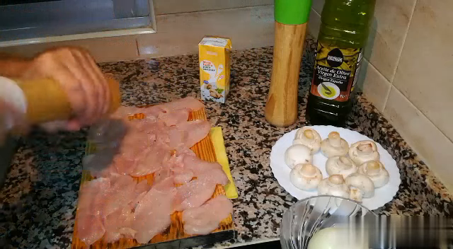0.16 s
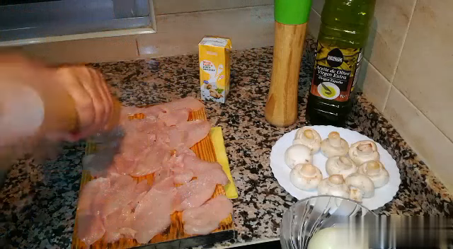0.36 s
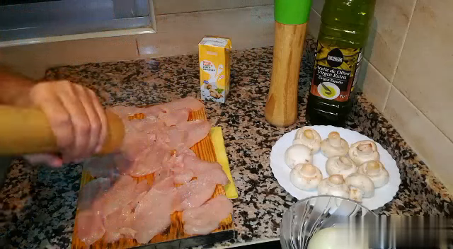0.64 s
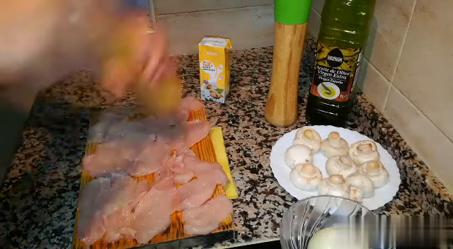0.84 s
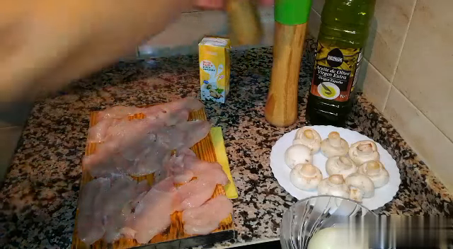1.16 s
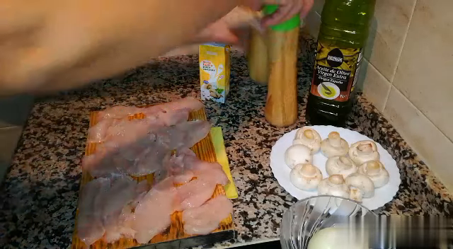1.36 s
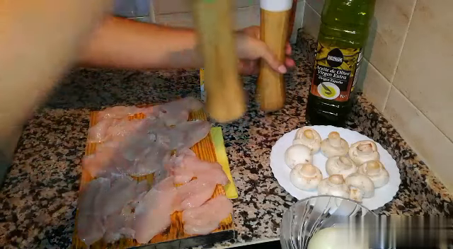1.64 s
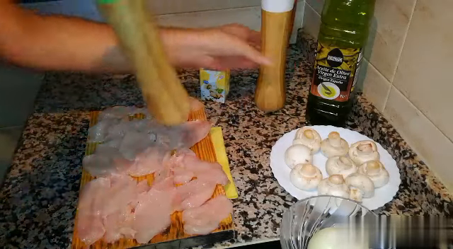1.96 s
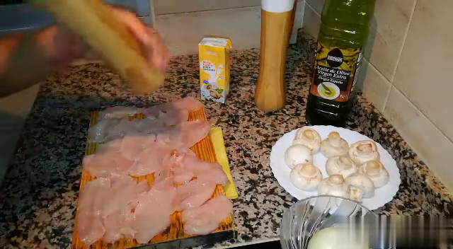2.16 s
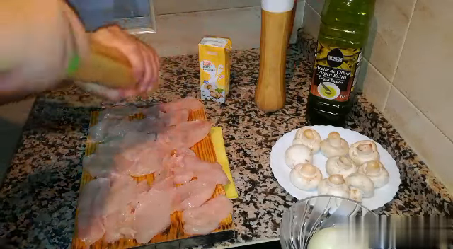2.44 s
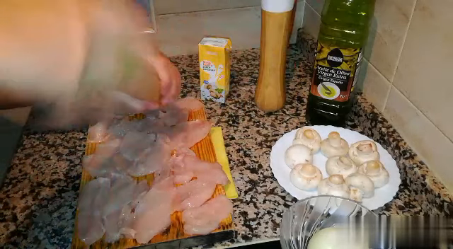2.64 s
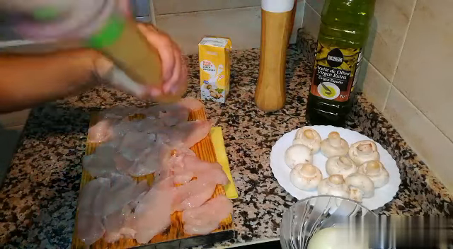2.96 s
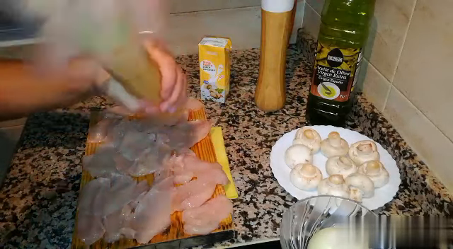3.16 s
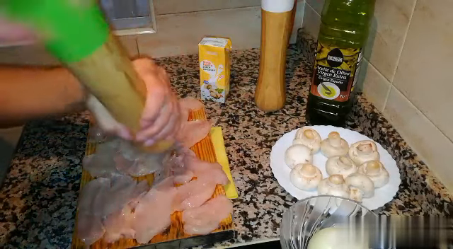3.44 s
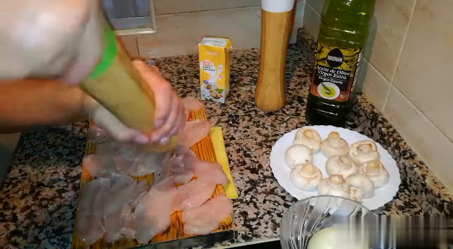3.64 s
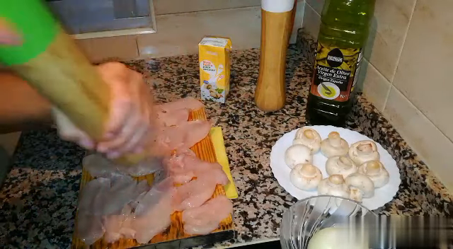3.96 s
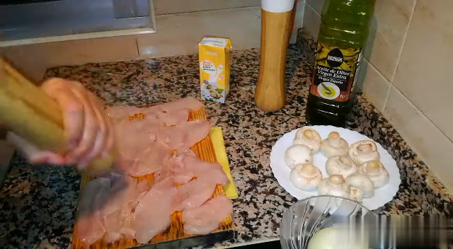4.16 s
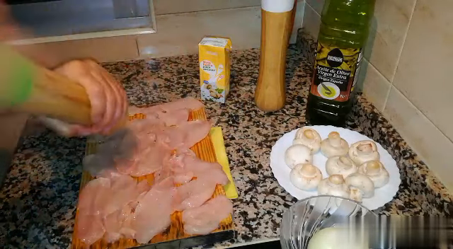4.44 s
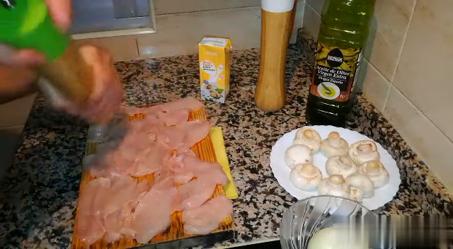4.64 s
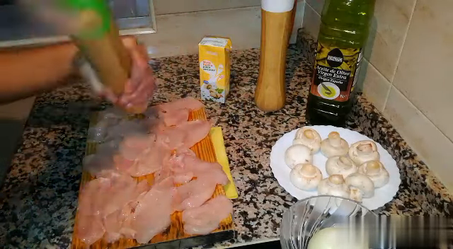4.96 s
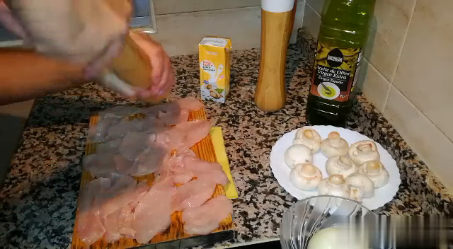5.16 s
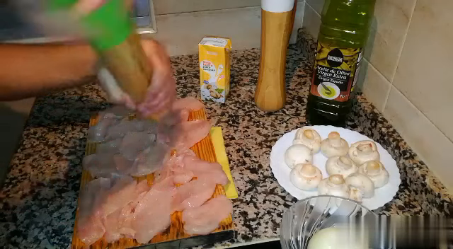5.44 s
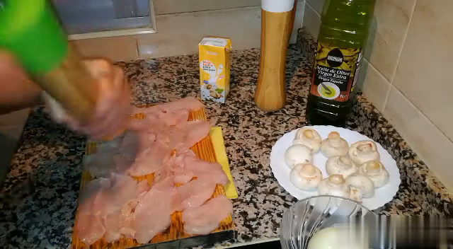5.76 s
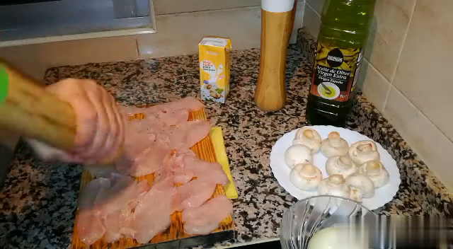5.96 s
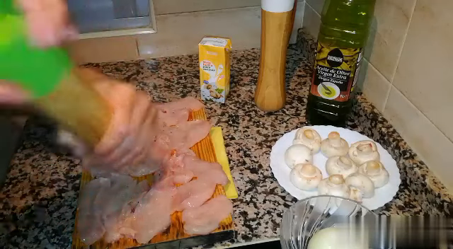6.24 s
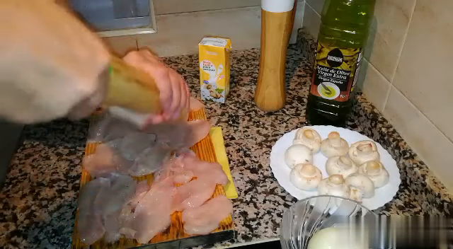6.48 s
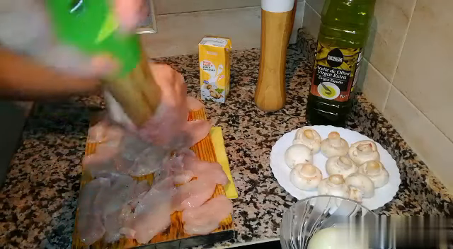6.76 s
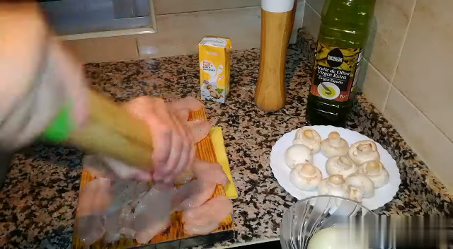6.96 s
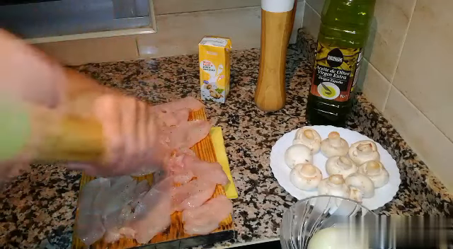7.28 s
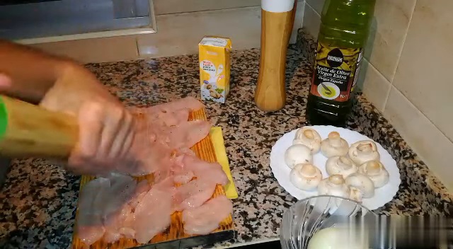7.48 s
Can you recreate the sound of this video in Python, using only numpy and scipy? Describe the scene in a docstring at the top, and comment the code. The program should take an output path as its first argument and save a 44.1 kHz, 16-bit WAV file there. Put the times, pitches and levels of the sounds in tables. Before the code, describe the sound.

Wooden mills grind salt, then pepper, in short crackling crunches, with a clack on a stone counter between and a faint hum.

```python
"""Two tall wooden mills are twisted over a board in a tiled kitchen corner: first salt, then pepper.
Each twist crushes a stream of tiny grains, with single loud cracks, that shake the wooden body and hiss
at the steel burr. The salt mill's spindle slips and rings; that mill is then set down and rocks on the
stone counter. Handling adds soft booms and thin tones. An appliance hums faintly throughout."""
import sys
import numpy as np
from scipy import signal
from scipy.fft import rfft, irfft, next_fast_len
from scipy.io import wavfile
from scipy.ndimage import uniform_filter1d, map_coordinates

SR = 44100
rng = np.random.default_rng(int(sys.argv[2]) if len(sys.argv) > 2 else 0)


def transcribe(signal):
    """Save signal, clipped to [-1, 1], as a 16-bit WAV file at the path in sys.argv[1]."""
    frames = np.atleast_2d(signal).T
    limited = np.clip(frames, -1, 1)
    pcm = np.round(limited * 32767).astype(np.int16)
    wavfile.write(sys.argv[1], SR, pcm)


N = 335683


def amp(db):
    return 10 ** (np.asarray(db) / 20)


def unit_rms(x):
    return x / np.sqrt(np.mean(x ** 2) + 1e-20)


def unit_energy(x):
    return x / np.sqrt(np.sum(x ** 2, axis=-1, keepdims=True) + 1e-20)


def curve_at(points, hz):
    """Interpolate (Hz, value) points on a log frequency axis."""
    point_hz, values = np.transpose(points)
    return np.interp(np.log(hz + 1), np.log(point_hz + 1), values)


def seconds(length_s):
    return np.arange(int(length_s * SR)) / SR


def add(track, start_s, sound):
    start = round(start_s * SR)
    part = sound[..., :N - start]
    track[..., start:start + part.shape[-1]] += part


def filtered(x, gain_at):
    """Zero-phase filter with gain gain_at(hz)."""
    size = next_fast_len(x.shape[-1] + SR // 10)
    return irfft(rfft(x, size) * gain_at(np.fft.rfftfreq(size, 1 / SR)), size)[..., :x.shape[-1]]


def coloured(x, spectrum, size=2048):
    """Minimum-phase filter of unit energy, shaped by (Hz, dB) points."""
    cepstrum = irfft(np.log(amp(curve_at(spectrum, np.fft.rfftfreq(size, 1 / SR)))))
    cepstrum[1:size // 2] *= 2
    cepstrum[size // 2 + 1:] = 0
    impulse = unit_energy(irfft(np.exp(rfft(cepstrum))))
    return signal.oaconvolve(x, impulse)[:len(x)]


def ring(modes, scatter_db, wave=np.cos, detune=0):
    """Damped modes at random strengths, with an optional common pitch shift; unit energy."""
    t = seconds(0.5)
    shift = 1 + detune * rng.normal()
    partials = [amp(db + scatter_db * rng.normal() - 60 * t / t60_s) * wave(2 * np.pi * shift * hz * t)
                for hz, db, t60_s in modes]
    return unit_energy(sum(partials))


# Each row: frequency in Hz, rms level in dB.
HUM_LINES = [(75.5, -87), (100, -74.5), (120, -74.5), (181, -86.5)]
# Each row: frequency in Hz, relative density in dB.
AIR_SPECTRUM = [(12, -44), (20, -11.5), (60, -18), (78, -14), (106, -13.5), (148, -18), (185, -8.5),
                (266, -22.5), (320, -17), (560, -22.5), (760, -17.5), (985, -20), (3400, -28.5),
                (4200, -29.5), (6720, -37.5), (11000, -52), (15500, -54.5)]


def hum_and_air():
    """An appliance's hum lines waver together in level over the still air of the room."""
    t = np.arange(N) / SR
    waver = map_coordinates(rng.standard_normal(int(3 * t[-1]) + 4), [3 * t])  # 3 new values a second
    hum = sum(np.sqrt(2) * amp(db + 1.6 * waver) * np.sin(2 * np.pi * (hz * t + rng.random()))
              for hz, db in HUM_LINES)
    noise = rng.standard_normal((2, N))
    mid, side = unit_rms(filtered(noise, lambda hz: amp(curve_at(AIR_SPECTRUM, hz))))
    side = filtered(side, lambda hz: amp(curve_at([(120, -11.0), (400, 1.5), (1500, 0.5)], hz)))
    return hum + amp(-72.0) * np.array([mid + side, mid - side])


# Each row: frequency in Hz, T60 in seconds.
TAIL_DECAY = [(100, 0.47), (260, 0.031), (700, 0.27), (1840, 0.26), (4850, 0.27), (12800, 0.22)]
# Each row: frequency in Hz, gain in dB.
TAIL_COLOUR = [(300, 0), (3000, -0.35), (6000, 0), (12000, -1)]


def room_tail():
    """Diffuse stereo decay; long waves reach both sides more alike."""
    def width_rad(hz):
        coherence = curve_at([(150, 0.31), (350, 0.0), (700, 0.0), (2000, 0.2)], hz)
        return np.arccos(coherence) / 2

    band_hz, t, bands = signal.stft(rng.standard_normal((2, SR // 2)), SR, nperseg=256)
    decay = amp(-60 * t / curve_at(TAIL_DECAY, band_hz)[:, None])
    _, noise = signal.istft(bands * decay, SR, nperseg=256)
    mid, side = noise[:, :SR // 2] * (1 - np.exp(-seconds(0.5) / 0.0024))
    mid = filtered(mid, lambda hz: np.cos(width_rad(hz)))
    side = filtered(side, lambda hz: np.sin(width_rad(hz)))
    tail = unit_energy(np.array([mid + side, mid - side]))
    return filtered(tail, lambda hz: amp(curve_at(TAIL_COLOUR, hz)))


# Standing waves between the walls. Each row: frequency in Hz, relative level in dB, T60 in seconds.
ROOM_MODES = [(196, -1.5, 0.27), (217, -9, 0.24), (317, -4.5, 0.66), (397, 3.5, 0.18), (524, -2.5, 0.65)]
# Each row: frequency in Hz, left minus right in dB.
STEREO_BALANCE = [(200, 0.5), (600, 0.6), (1200, 0.5), (3000, 3), (5500, 2), (8000, 0), (12000, -4)]


def kitchen(x, walls_db, tail_db, modes_db=-23, max_lag_s=0.00008):
    """Direct sound, quick echoes off counter and tiles, room modes and tail, in stereo."""
    response = amp(tail_db) * room_tail() + amp(modes_db) * ring(ROOM_MODES, scatter_db=2.5)
    for left_s in rng.uniform(0.0006, 0.009, size=14):
        echo = amp(walls_db) * np.exp(-left_s / 0.0048) * rng.choice([-1, 1])
        right_s = left_s + rng.uniform(-0.0007, 0.0007)
        response[0, round(left_s * SR)] += echo
        response[1, abs(round(right_s * SR))] += echo
    # direct path: the left lags, depending on where the mill is held
    response[0, round(max_lag_s * SR * rng.random())] += 1
    response[1, 0] += 1
    heard = signal.fftconvolve(x[None], unit_energy(response), axes=1)
    return filtered(heard, lambda hz: amp(np.outer([0.5, -0.5], curve_at(STEREO_BALANCE, hz))))


def fractures(samples, rate_per_s, spread_db):
    """Breaking grains: sparse impulses of unequal size, unit rms."""
    sizes = amp(spread_db * np.clip(rng.standard_normal(samples), -2, 2)) * rng.choice([-1, 1], samples)
    return unit_rms(sizes * (rng.random(samples) < rate_per_s / SR))


SCRAPE_S, SCRAPE_DB, SCRAPE_DB_PER_S = 0.025, -0.5, 1299
BITE_S, BITE_SLACK_DB = 0.0038, 14.5
SAG_DB_PER_S, RELEASE_DB_PER_S = 10, 418.5
FIRM_PUSH_DB = -24
FIZZ_POWER = 1.5  # sharper fractures reach further into the top octave


def crush(length_s, rise_s, db, hiss_db, knock_db, firm_grains_per_s, spread_db):
    """One push: the burr scrapes in, bites, sags as grains give way and releases as the wrist stops."""
    t = seconds(SCRAPE_S + length_s + 0.1) - SCRAPE_S
    slack_db = BITE_SLACK_DB * np.clip(1 - t / max(rise_s, 1 / SR), 0, 1) ** 2
    scrape_cut_db = SCRAPE_DB_PER_S * np.maximum(BITE_S - t, 0) + SCRAPE_DB * (t < 0)
    fade_db = SAG_DB_PER_S * (t - rise_s) + RELEASE_DB_PER_S * np.maximum(t - length_s, 0)
    force = amp(db - slack_db - scrape_cut_db - fade_db)
    # a weaker push shaves more, smaller grains; each sheds a puff of dust
    grains_per_s = firm_grains_per_s * amp(0.5 * (FIRM_PUSH_DB - db))
    grains = fractures(len(t), grains_per_s, spread_db)
    puffs = np.sqrt(np.abs(uniform_filter1d(grains ** 2, size=60)))
    dust = unit_rms(rng.standard_normal(len(t)) * puffs)
    # a slack burr slides and hisses; only a firm bite shakes the base
    sharpness = amp(hiss_db + 0.43 * slack_db)
    thuds = fractures(len(t), 2 * grains_per_s, spread_db) * amp(knock_db - 0.38 * slack_db)
    return force * np.array([grains, dust * sharpness, dust * sharpness ** FIZZ_POWER, thuds])


def burst(t60_s, snap):
    """A sharp impulse and a few ms of splintering, unit energy."""
    t = seconds(0.04)
    splinters = unit_energy(rng.standard_normal(len(t)) * amp(-60 * t / t60_s))
    splinters[0] += snap
    return unit_energy(splinters)


def ping(hz, t60_s, rise_s):
    """A bursting grain kicks the burr for a few cycles, unit energy."""
    t = seconds(0.04)
    swing = np.sin(2 * np.pi * hz * t) * amp(-60 * t / t60_s) * (1 - np.exp(-t / rise_s))
    return unit_energy(np.diff(swing, prepend=0))  # a small body radiates its change of motion: no bass


# Burr hiss and its finer fizz. Each row: frequency in Hz, relative gain in dB.
BURR_SPECTRUM = [(800, -40), (2500, 7.5), (4200, -2.5), (5700, 5), (7000, -2), (8300, -12), (11000, -19),
                 (15000, -34.5), (16000, -39)]
FIZZ_SPECTRUM = [(2000, -22), (5000, 3.5), (7500, 6), (9500, -0.5), (12000, -5.5), (14500, -9.5),
                 (15500, -8.5), (16000, -21.5)]
# Each row: frequency in Hz, relative level in dB, T60 in seconds.
BURR_MODES = [(1970, 4, 0.073), (2710, -2.5, .03), (4020, -3, 0.027), (4700, -2.5, 0.005), (5710, -3, .02),
              (6910, -5, .02)]
NEW_GRIP_S, GRIP_DETUNE = 0.25, 0.018  # push spacing that starts a new twist; its relative pitch scatter


def mill(pushes, cracks, wood_spectrum, base_spectrum, body_modes, *, wood_ring_db, steel_ring_db,
         crunch_db, hiss_db, fizz_db, knock_db, firm_grains_per_s, spread_db,
         crack_db, ping_db, crack_hiss_db, crack_fizz_db, crack_knock_db, crack_t60_s):
    """Fractures shake body and base and hiss at the burr; the mill moves, so each twist echoes anew."""
    forces, pings, out = np.zeros((4, N)), np.zeros(N), np.zeros((2, N))
    gains = amp([[crunch_db], [hiss_db], [fizz_db], [knock_db]])
    for start_s, *push in pushes:
        add(forces, start_s - SCRAPE_S, gains * crush(*push, firm_grains_per_s, spread_db))
    body, burr, fizz, knock = forces
    push_s, *_, push_knock_db = np.transpose(pushes)
    for start_s, db, hz, pitched_db, bright_db in cracks:
        # a crack knocks the base as firmly as the push it falls in
        low_db = push_knock_db[np.searchsorted(push_s, start_s + 2 * BITE_S) - 1]
        top_db = FIZZ_POWER * bright_db
        add(body, start_s, amp(db + crack_db) * burst(crack_t60_s, snap=0.94))
        add(pings, start_s, amp(db + pitched_db + ping_db) * ping(hz, t60_s=0.0085, rise_s=0.00062))
        add(burr, start_s, amp(db + bright_db + crack_hiss_db) * burst(t60_s=0.0036, snap=0.14))
        add(fizz, start_s, amp(db + top_db + crack_fizz_db) * burst(t60_s=0.021, snap=0.11))
        add(knock, start_s, amp(db + low_db + crack_knock_db) * burst(t60_s=0.0044, snap=0.089))
    body = coloured(body, wood_spectrum)
    hiss = coloured(burr, BURR_SPECTRUM) + coloured(fizz, FIZZ_SPECTRUM)
    direct = body + pings + hiss + coloured(knock, base_spectrum)
    twist_s = list(push_s[np.diff(push_s, prepend=-1) > NEW_GRIP_S] - 0.04)
    for start_s, end_s in zip(twist_s, twist_s[1:] + [push_s[-1] + 0.5]):
        twist = slice(round(start_s * SR), round(end_s * SR))
        wood = signal.oaconvolve(body[twist], ring(body_modes, scatter_db=4.5, detune=GRIP_DETUNE))
        steel = signal.oaconvolve(burr[twist], ring(BURR_MODES, scatter_db=1.0))
        ringing = amp(wood_ring_db) * wood + amp(steel_ring_db) * steel
        sound = direct[twist] + ringing[:len(direct[twist])]
        add(out, start_s, kitchen(sound, walls_db=-2.0, tail_db=0.98))
    return out


# Wrist pushes, each turning the burr until it catches.
# Each row: start, length and rise in seconds, level in dB, relative hiss and knock in dB.
SALT_PUSHES = [(0.104, 0.094, 0.062, -34.5, -7, -16.5), (0.314, 0.018, 0.012, -49.5, -8, -9.5),
               (0.543, 0.071, 0.037, -42.5, -3.5, -10), (0.61, 0.025, 0.0114, -41, -9, -8)]
# Bursting grains and jolts of the burr.
# Each row: start in seconds, level in dB, ping pitch in Hz, relative ping and hiss in dB.
SALT_CRACKS = [(0.315, -46, 1400, -10, 0.5), (0.346, -37, 1850, -4.5, -22), (0.527, -47, 1410, -7, -32),
               (0.561, -33.5, 950, 3, -14), (0.6155, -22, 1600, 2, -15)]
# Wooden body and hollow base. Each row: frequency in Hz, relative gain in dB.
SALT_WOOD = [(100, -52), (300, -25), (550, -12), (750, -19.5), (1100, -9), (1400, -6.5), (1750, -5.5),
             (2250, 3.5), (2700, -1), (3100, 0), (4000, -8), (7000, -36), (12000, -40)]
SALT_BASE = [(30, -58.5), (250, -12), (420, -9), (560, -7.5), (720, -0.5), (950, 7.5), (1380, 6.5),
             (2000, -5), (3500, -12), (9000, -56)]
# Body resonances. Each row: frequency in Hz, relative level in dB, T60 in seconds.
SALT_MODES = [(1368, -4, .05), (2240, 1, 0.026), (2690, -6.5, .05), (3070, -4, .06), (4030, 5, .08)]


def salt_mill():
    """Fine crystals crush densely and thinly."""
    return mill(SALT_PUSHES, SALT_CRACKS, SALT_WOOD, SALT_BASE, SALT_MODES,
                wood_ring_db=-19.5, steel_ring_db=-16, firm_grains_per_s=1200, spread_db=1.0,
                crunch_db=1.2, hiss_db=3, fizz_db=-5.0, knock_db=3,
                crack_db=13, ping_db=19.5, crack_t60_s=0.0029,
                crack_hiss_db=22.5, crack_fizz_db=-0.5, crack_knock_db=23.0)


# Each row: start in seconds, level in dB.
SPINDLE_SLIPS = [(0.559, -14.5), (0.618, -6.5)]
# Each row: frequency in Hz, relative level in dB, T60 in seconds.
SPINDLE_MODES = [(892, 5.5, 0.21), (1133, -13, 0.091), (1544, 1, 0.13), (1772, 6, 0.26), (2180, -9.5, 0.11)]


def spindle(blur_hz=32):
    """The salt mill's spindle slips free and rings; the rubbing burr makes each mode's phase wander."""
    out, t = np.zeros((2, N)), seconds(0.45)
    for start_s, db in SPINDLE_SLIPS:
        steps_rad = rng.standard_normal((len(SPINDLE_MODES), len(t))) * np.sqrt(2 * np.pi * blur_hz / SR)
        squeak = sum(amp(mode_db - 60 * t / t60_s) * np.sin(2 * np.pi * hz * t + drift)
                     for (hz, mode_db, t60_s), drift in zip(SPINDLE_MODES, np.cumsum(steps_rad, axis=1)))
        add(out, start_s, amp(db) * kitchen(unit_energy(squeak), walls_db=-10.5, tail_db=5.0))
    return out


# Each row: start and length in seconds, pitch in Hz, peak level in dB.
HANDLING_TONES = [(1.27, 0.1, 124, -56.5), (1.78, 0.19, 2627, -69), (3.14, 0.243, 2616, -75),
                  (3.5, 0.091, 294, -47), (5.48, 0.13, 183.6, -47.5), (5.96, 0.15, 117, -48.5),
                  (6.34, 0.092, 189, -37), (6.41, 0.065, 107.7, -48), (7.04, 0.16, 204, -51.5),
                  (7.2, 0.15, 2640, -69.5)]


def handling():
    """Soft booms and faint thin tones swell and fade, slightly unsteady, as the mills are handled."""
    out = np.zeros(N)
    for start_s, length_s, hz, db in HANDLING_TONES:
        t = seconds(length_s)
        waver = 0.024 * unit_rms(uniform_filter1d(rng.standard_normal(len(t)), size=200))
        tone = np.sin(2 * np.pi * np.cumsum(hz * (1 + waver)) / SR)
        add(out, start_s, amp(db) * np.sin(np.pi * t / length_s) * tone)
    return out


# Each row: start in seconds, level in dB, upper cutoff in Hz.
FOOT_CONTACTS = [(1.6099, -14.5, 13800), (1.65, -20, 294), (1.728, -28.5, 400)]
# Each row: frequency in Hz, relative gain in dB.
FOOT_SPECTRUM = [(30, -41), (70, -21), (125, -7.5), (180, -8), (260, -4.5), (400, -12.5), (520, -11),
                 (760, -1), (1150, 1.5), (1500, -7.5), (1800, -12.5), (2200, -21), (2800, -21.5),
                 (3350, -18.5), (4100, -31), (6000, -28.5), (9000, -56), (15000, -73.5)]
# Each row: frequency in Hz, relative level in dB, T60 in seconds.
COUNTER_MODES = [(124, 5, 0.25), (196, -1.5, 0.21), (225.3, -4, 0.39), (402, -7, 0.5), (450, -8, 0.3),
                 (683.5, -4.5, 0.2), (830, 4, 0.11), (882, -4, 0.2), (1130, 2.5, 0.17), (1292, -11, 0.23),
                 (1580, -13.5, 0.19)]


def set_down():
    """The salt mill's foot clacks on stone, then rocks with two thuds; each contact rings the counter."""
    out = np.zeros((2, N))
    for start_s, db, cutoff_hz in FOOT_CONTACTS:
        impact = np.pad(burst(t60_s=0.0075, snap=2.0), (0, SR // 2))
        contact = signal.butter(2, [65, cutoff_hz], "bandpass", fs=SR, output="sos")
        clack = signal.sosfilt(contact, coloured(impact, FOOT_SPECTRUM))
        boom = signal.sosfilt(contact, ring(COUNTER_MODES, scatter_db=2.5, wave=np.sin))
        add(out, start_s, amp(db + 23.0) * kitchen(clack, walls_db=0.0, tail_db=5))
        add(out, start_s, amp(db + 16.0) * boom)
    return out


# Each row: start, length and rise in seconds, level in dB, relative hiss and knock in dB.
PEPPER_PUSHES = [ (2.28, 0.12, 0.043, -78, 7.5, -12), (2.364, 0.0497, 0.031, -35.5, -12.5, 0.5),
                 (2.416, 0.1, 0.0032, -25, -16.5, -9.5), (2.893, 0.14, 0.043, -52.5, -2.5, -1),
                 (3.005, 0.071, .005, -50.5, -1.5, 2.5), (3.425, 0.063, 0.0437, -28.5, -16.5, -4.5),
                 (3.548, 0.052, 0.06, -31, -14, -1.5), (3.655, 0.023, 0.0073, -41, -6.5, -4),
                 (4.009, 0.014, 0.012, -36.5, -19.5, -5), (4.143, 0.16, .005, -45, 2.5, -15.5),
                 (4.654, 0.1, 0.049, -37.5, -7, -11.5), (4.755, 0.022, .01, -34.5, -20.5, -2.5),
                 (5.056, 0.11, 0.023, -24, -11.5, -10), (5.457, 0.045, 0.034, -26, -10, -10.5),
                 (5.525, 0.0426, 0.017, -22, -16, -10), (5.892, 0.029, 0.014, -22.5, -8.5, -9),
                 (5.975, 0.029, 0.012, -27, -16, -5), (6.303, 0.0046, 0.0042, -34, -13, -4),
                 (6.334, 0.098, 0.0082, -21, -17.5, -11.5), (6.77, 0.027, 0.01, -57.5, -1.5, -4),
                 (6.824, 0.0098, .003, -45.5, 0, -9.5), (6.931, .012, 0.0024, -45, 4.5, -23),
                 (7.0, 0.085, 0.021, -44, 1.5, -44), (7.062, 0.055, 0.04, -41, -8.5, -4.5),
                 (7.528, 0.25, 0.012, -21.5, -13.5, -10)]
# Each row: start in seconds, level in dB, ping pitch in Hz, relative ping and hiss in dB.
PEPPER_CRACKS = [(2.366, -34.5, 1330, 6.5, -31), (2.4157, -14, 2860, -1, -25),
                 (2.458, -11.5, 2703, 1.5, -15.5), (2.496, -13, 2300, -3.5, -19),
                 (2.872, -49, 1520, 4, -36), (3.008, -25.5, 1410, -5, -30), (3.424, -39, 1402, -1, -26),
                 (3.445, -19, 1230, 2.5, -34), (3.455, -12, 1290, -1, -29.5),
                 (3.478, -11.5, 1370, -2.5, -25.5), (3.539, -31, 2940, -1, 1.5),
                 (3.557, -18.5, 1860, -3.5, -5), (3.596, -16, 1220, -1.5, -19.5),
                 (3.601, -13.5, 1560, -5.5, -19.5), (3.609, -15.5, 2880, 1.5, -29),
                 (3.662, -22.5, 1187, -0.5, -14), (4.017, -18, 1750, -4.5, -38),
                 (4.0202, -20.5, 1700, -4, -37.5), (4.026, -26.5, 2100, -6.5, -29.5),
                 (4.143, -15.5, 1910, -1.5, -2.5), (4.191, -18.5, 2670, -0.5, -2.5),
                 (4.29, -27, 1945, -7, -10.5), (4.319, -30.5, 1047, 2.5, -31), (4.655, -40, 1900, 9, -13),
                 (4.6839, -27.5, 1360, 7, -25.5), (4.761, -26.5, 1900, -5, -24),
                 (4.768, -20.5, 1650, -4, -19.5), (5.055, -27.5, 2300, -2.5, -16),
                 (5.064, -21, 1700, -2.5, -22), (5.087, -16.5, 2200, -3, -21.5), (5.1, -8.5, 1827, -3, -23),
                 (5.111, -9.5, 2700, 0.5, -18.5), (5.124, -10, 2860, 1.5, -19),
                 (5.458, -26.5, 1243, 2, -16.5), (5.472, -16.5, 2540, -6, -3.5),
                 (5.484, -11, 1343, -6, -20.5), (5.491, -9, 2300, -1.5, -17.5),
                 (5.548, -12.5, 1321, -2, -26.5), (5.569, -13, 1640, -1.5, -29),
                 (5.882, -26, 1880, -3, -15.5), (5.899, -19.5, 1900, -4.5, -24.5),
                 (5.904, -6.5, 1600, -7.5, -28), (5.915, -7.5, 2700, 0.5, -27.5),
                 (5.985, -5, 2260, -2, -20.5), (6.013, -17.5, 1650, -2, -22.5),
                 (6.309, -28.5, 1326, 7.5, -33.5), (6.335, -18, 1280, 0.5, -36),
                 (6.342, -12.5, 1302, 5, -34), (6.348, -15.5, 1900, -2, -25),
                 (6.4224, -10, 2790, -2, -25.5), (6.432, -13.5, 2060, -5.5, -16),
                 (6.8252, -24.5, 1500, -5, -10.5), (6.845, -21.5, 1930, -3.5, -7.5),
                 (6.873, -31.5, 2700, 5, -12.5), (6.935, -25.5, 2100, -11, -5.5),
                 (7.067, -25, 3000, 3.5, -11.5), (7.085, -27, 2900, -5, -9.5),
                 (7.109, -27.5, 1104, 7, -29.5), (7.12, -30.5, 1200, 5, -23.5),
                 (7.524, -26, 1300, -7, -25.5), (7.531, -14, 1300, 0, -36.5),
                 (7.538, -11.5, 2500, -3.5, -24), (7.546, -10, 2200, -2, -23),
                 (7.564, -11, 2700, -0.5, -21.5), (7.585, -15.5, 2110, -1.5, -19),
                 (7.596, -10.5, 1600, -6.5, -18.5)]
# Wooden body and hollow base. Each row: frequency in Hz, relative gain in dB.
PEPPER_WOOD = [(45, -57), (200, -32), (520, -26.5), (680, -16.5), (880, -3.5), (1250, 0.5), (1700, 1),
               (2250, 1), (2600, -6), (3050, 0), (3350, -6.5), (3700, -17.5), (6000, -26.5), (12000, -62.5)]
PEPPER_BASE = [(35, -52), (80, -15), (170, -15.5), (300, -10), (520, -6), (720, -4), (950, 1), (1300, -2.5),
               (2000, -16), (3500, -34.5), (9000, -61)]
# Body resonances. Each row: frequency in Hz, relative level in dB, T60 in seconds.
PEPPER_MODES = [(1347, -8.5, 0.027), (1720, -11.5, 0.048), (2020, 3.5, 0.011), (2890, 4.5, 0.012),
                (3106, -0.5, 0.012)]


def pepper_mill():
    """Peppercorns break in fewer, louder, woodier fractures than salt."""
    return mill(PEPPER_PUSHES, PEPPER_CRACKS, PEPPER_WOOD, PEPPER_BASE, PEPPER_MODES,
                wood_ring_db=-25, steel_ring_db=-10.5, firm_grains_per_s=650, spread_db=4.0,
                crunch_db=-2.5, hiss_db=-1.0, fizz_db=-24.5, knock_db=-0.5,
                crack_db=12.5, ping_db=13.5, crack_t60_s=0.016,
                crack_hiss_db=22.0, crack_fizz_db=15.5, crack_knock_db=8.5)


def scene():
    """Both mills, the set-down and the handling over the hum, in stereo."""
    salt, pepper = salt_mill(), pepper_mill()
    bass_cut = signal.butter(4, 280, "highpass", fs=SR, output="sos")
    salt = signal.sosfilt(bass_cut, salt + spindle())  # the light salt mill radiates no bass
    return salt + pepper + set_down() + handling() + hum_and_air()


def record(dry, top_hz=15850):
    """Brick-wall low-pass."""
    return filtered(dry, lambda hz: hz < top_hz)


dry = scene()
out = record(dry)
transcribe(out)
```